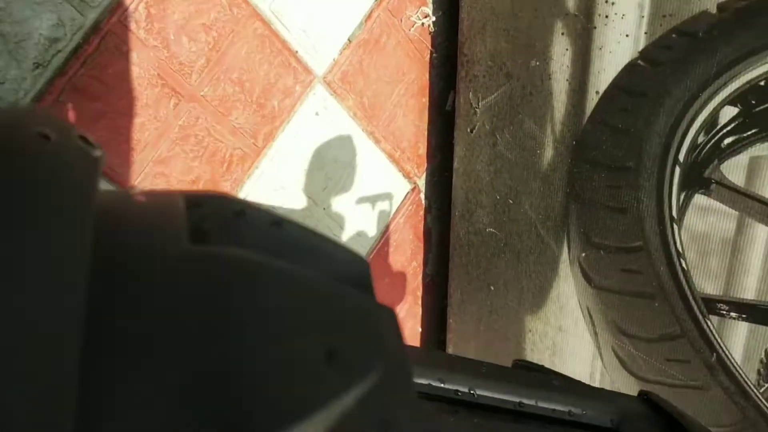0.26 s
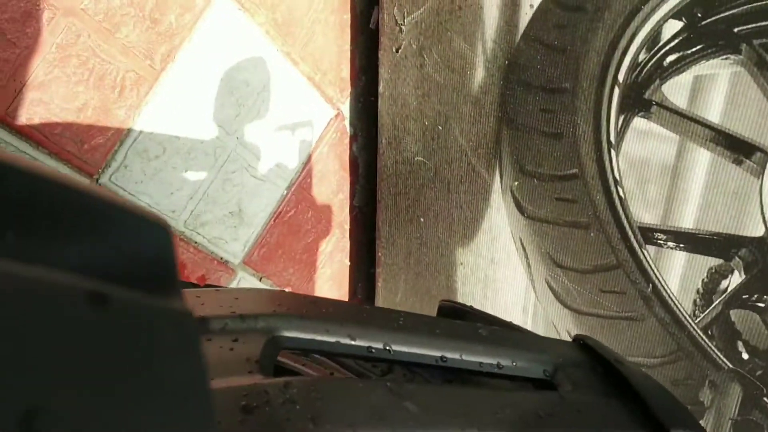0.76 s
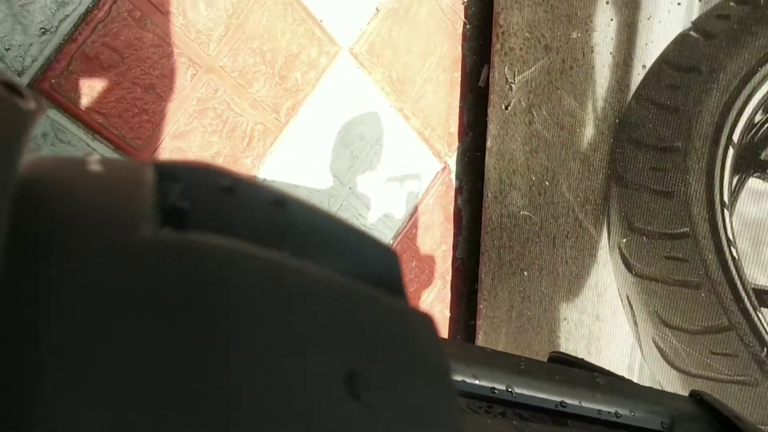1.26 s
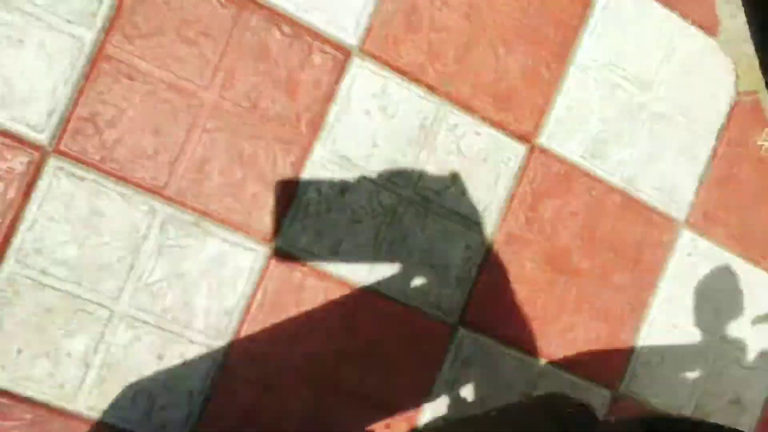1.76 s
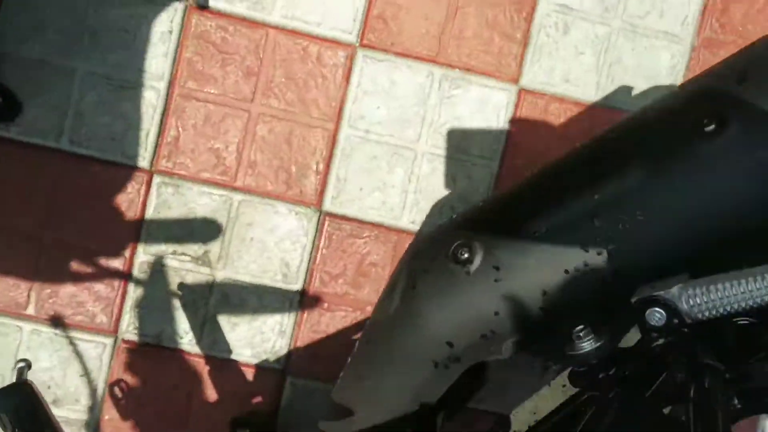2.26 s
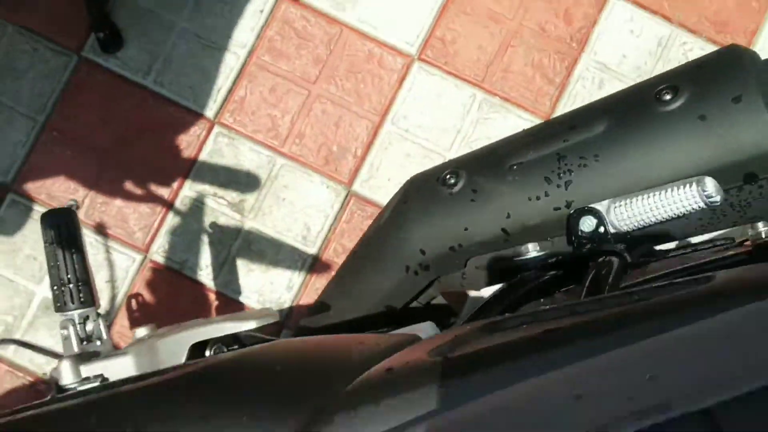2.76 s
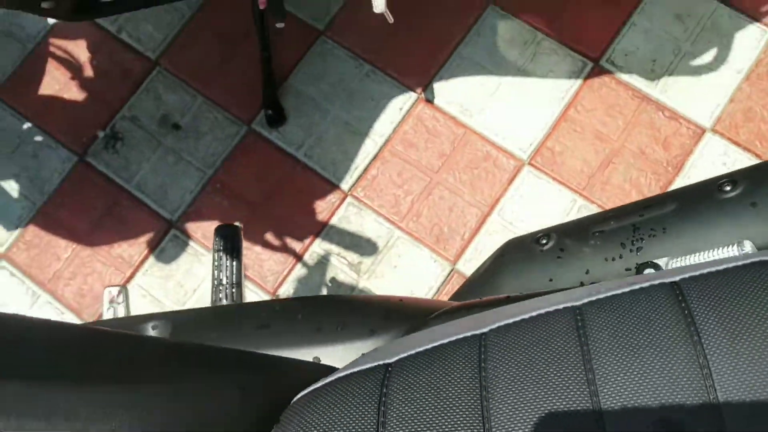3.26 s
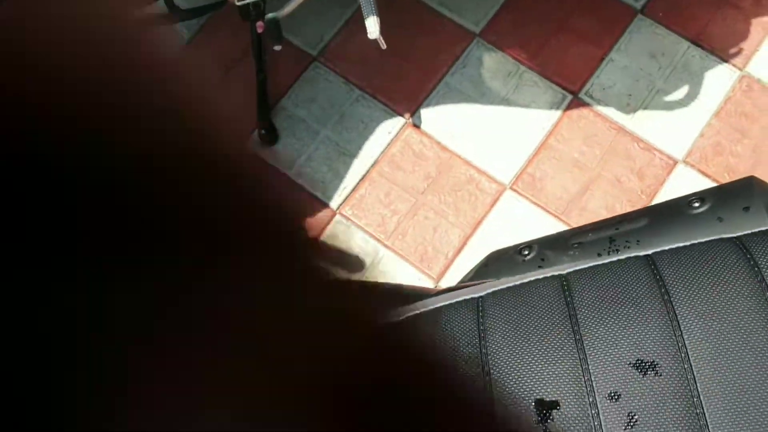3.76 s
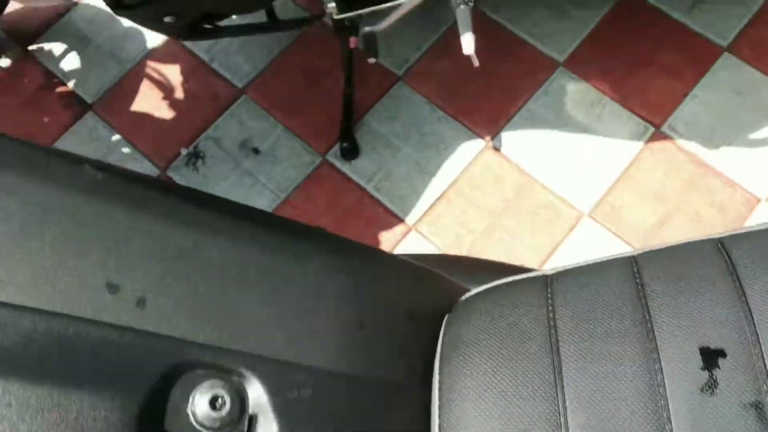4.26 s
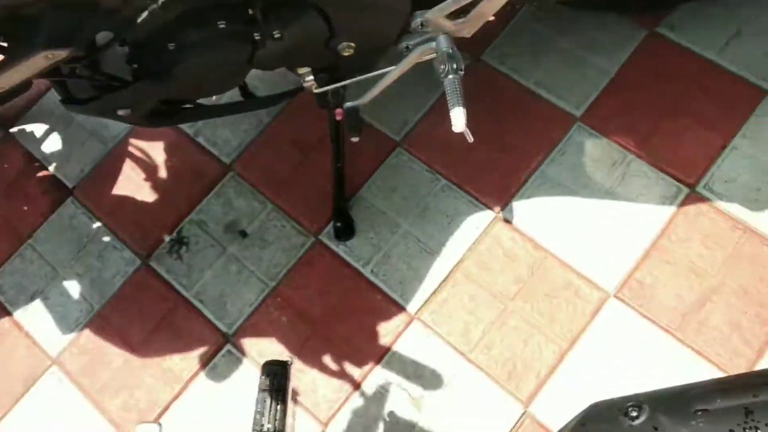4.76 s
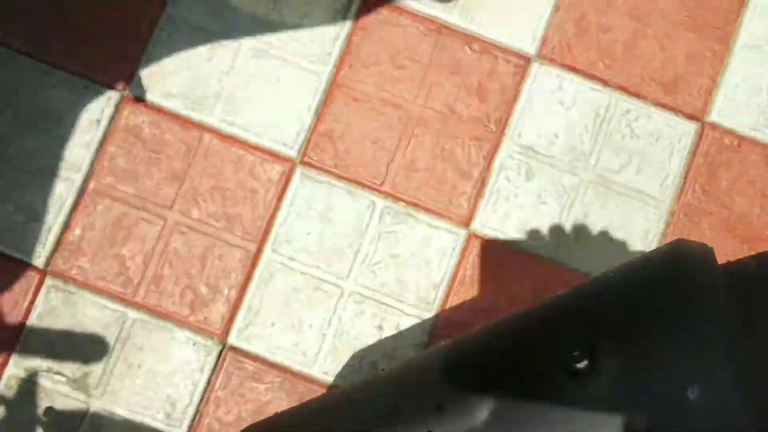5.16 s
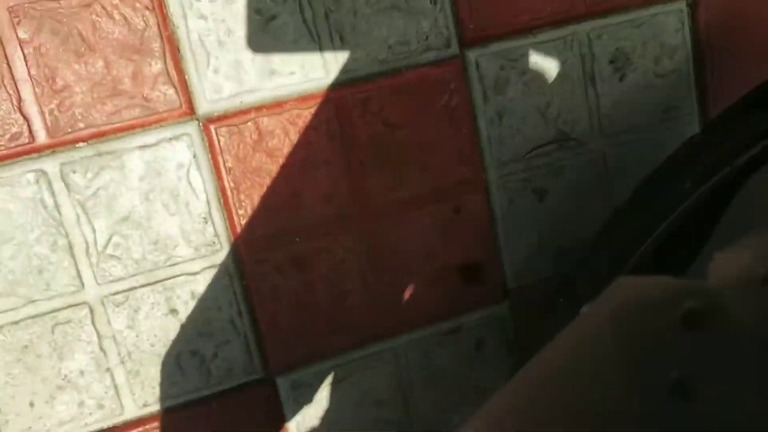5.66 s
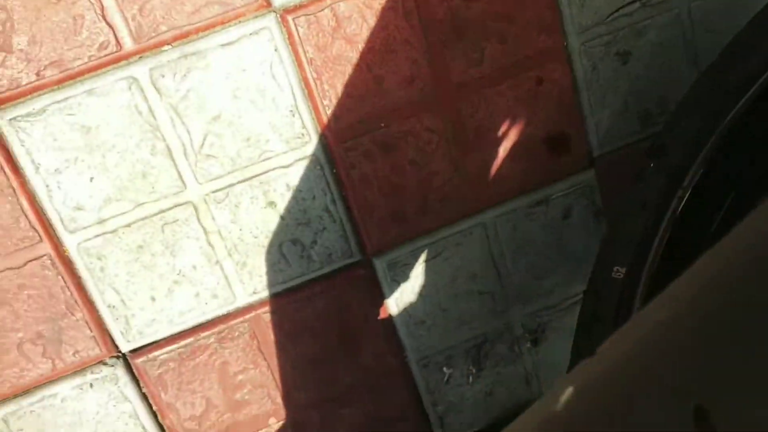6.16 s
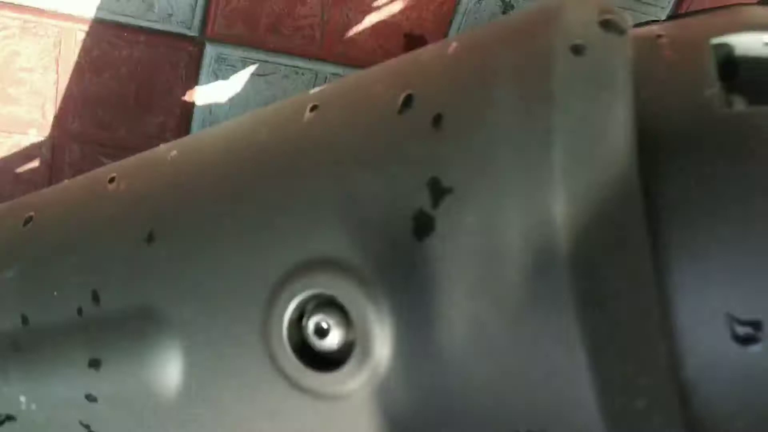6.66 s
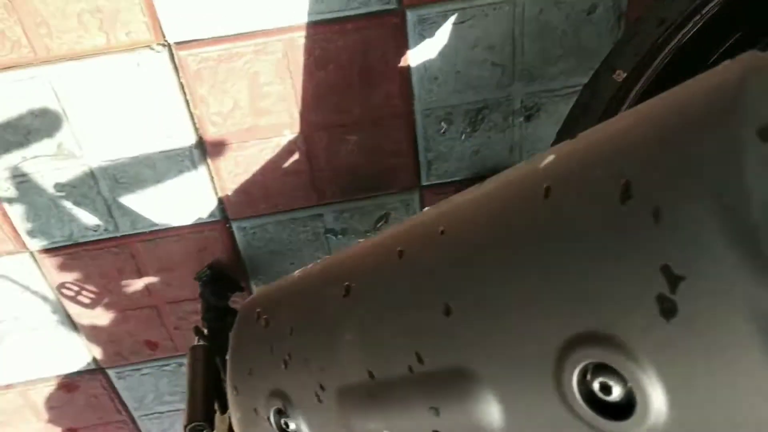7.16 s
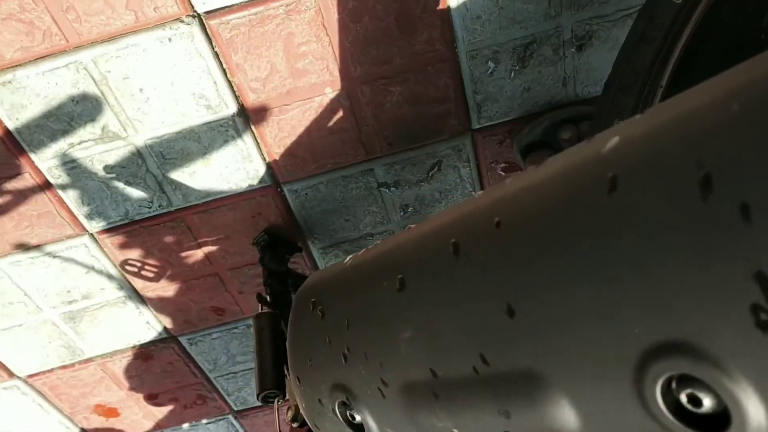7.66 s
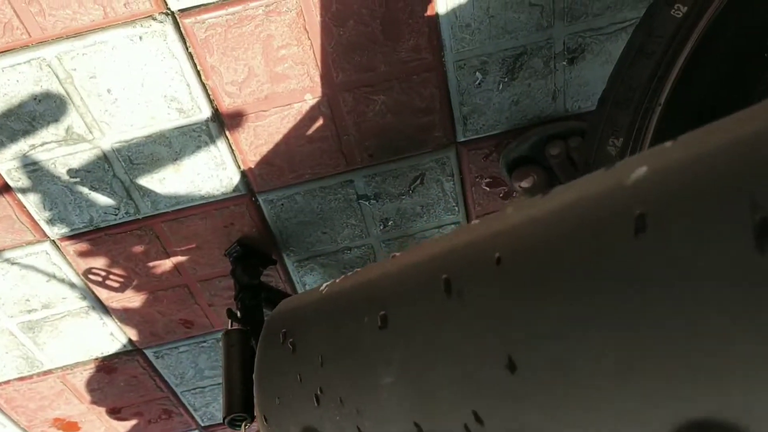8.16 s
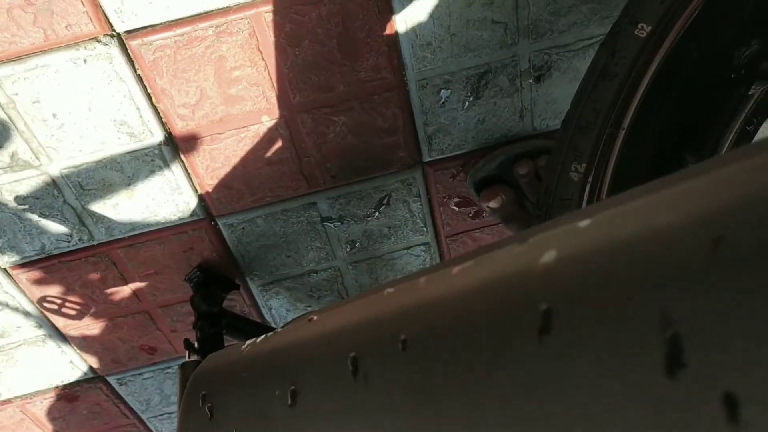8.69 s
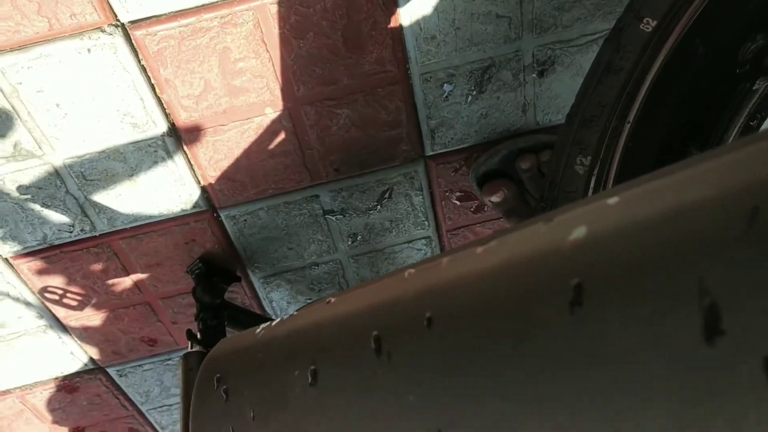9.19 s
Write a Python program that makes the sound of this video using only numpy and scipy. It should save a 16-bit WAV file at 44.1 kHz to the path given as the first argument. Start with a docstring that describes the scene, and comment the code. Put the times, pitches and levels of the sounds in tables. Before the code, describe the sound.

A single-cylinder motorcycle heard very close outdoors. It begins at a fast, throaty idle with metallic rattle and valve ticking, drops after about two seconds to a slow, separate thumping, with more intake gulping from above the seat, then moves down beside the silencer. Near the end a throttle blip surges with a rasp, falls away, and a second one is rising at the cut.

```python
"""A single-cylinder motorcycle is heard first at a fast idle; it drops to a slow idle, then two throttle blips rise,
the second still rising at the end. Each firing excites decaying silencer modes, a cracking wave front and the frame.
Whir, hiss, fin rattle, valve ticks, intake gulps and rasp are shaped noise or short rings timed by the crank.
The microphone pair moves from the tail to the seat and down to the silencer, changing levels, colour and panning."""
import sys
import numpy as np
from scipy import signal
from scipy.fft import rfft, irfft, next_fast_len
from scipy.io import wavfile

SR = 44100
rng = np.random.default_rng(int(sys.argv[2]) if len(sys.argv) > 2 else 0)


def transcribe(signal):
    """Save signal, clipped to [-1, 1], as a 16-bit WAV file at the path in sys.argv[1]."""
    frames = np.atleast_2d(signal).T
    limited = np.clip(frames, -1, 1)
    pcm = np.round(limited * 32767).astype(np.int16)
    wavfile.write(sys.argv[1], SR, pcm)


N = 415863
T = np.arange(N) / SR   # s

# States: 0 pulling, 1 idle from above, 2 idle close by, 3 throttle shut, 4 stumbling just after it shuts.
# Places: 0 tail, 1 seat, 2 silencer at idle, 3 silencer during the blips. One cycle holds one firing.

# Crank speed: time_s, firings_per_s
SPEED = [(0.0, 24.64), (0.6, 23.46), (1.42, 24.36), (1.59, 23.52), (1.68, 23.81), (2.19, 16.45),
         (3.82, 15.9), (4.36, 16.12), (4.56, 15.9), (6.26, 15.43), (7.12, 15.57), (7.46, 15.42),
         (7.62, 14.77), (7.84, 22.3), (8.26, 36.7), (8.37, 37.8), (8.5, 35.07), (8.66, 32.23), (8.78, 30.1),
         (8.86, 26.83), (9.17, 23.07), (9.43, 31.8)]
# Engine state, neighbours cross-fading: time_s, state
SPELLS = [(0, 0), (1.79, 0), (1.8, 1), (1.99, 1), (2.0, 0), (2.04, 0), (2.05, 1), (4.95, 1), (5.45, 2),
          (7.6, 2), (7.8, 0), (8.39, 0), (8.4, 4), (8.53, 4), (8.62, 3), (9.04, 3), (9.05, 0), (9.43, 0)]
# Listening place, neighbours cross-fading: time_s, place
PLACES = [(0, 0), (1.8, 0), (2.1, 1), (4.9, 1), (5.5, 2), (7.6, 2), (7.9, 3), (9.43, 3)]
# Delay of left behind right, of which each source takes a share: time_s, lag_samples
LAG = [(0, 19.5), (2.7, 19), (3.2, -6), (4.1, 17.5), (4.9, -19.5), (9.43, -11)]
FIRST_FIRING = .37   # cycles before the first firing
IDLE_PER_S, FAST_IDLE_PER_S = 16, 24.5   # firings per s

# Spectrum of the hand's rumble: frequency_hz, density_db_per_hz
HANDLING = [(12, -52), (20, -22), (43, -12), (80, -15), (110, -2), (140, -14), (240, -120)]
HANDLING_DB, CUTOFF_HZ = -57, 15650

# Engine at the microphones: time_s, whir_db at slow idle speed, left_right_db
ENGINE = [(0, -33, 0.5), (.6, -35.5, 2.5), (.95, -35, 5.5), (1.3, -34.5, 3.5), (1.95, -32, 0.5),
          (2.06, -28, 0), (2.7, -28.5, 0.5), (3.4, -31.5, 1.3), (4.0, -30.5, 1), (4.4, -32.5, -1),
          (5.0, -30.5, -0.8), (5.8, -33, -2), (7.7, -32, -3), (7.95, -33.5, 0), (8.2, -32.5, -1),
          (8.45, -34, -2.5), (8.8, -36, 0), (9.15, -34, -1), (9.43, -33, 2)]
# Whir spectrum before the casing: frequency_hz, density_db_per_hz
WHIR = [(210, -69), (350, -12.5), (663, -6), (749, -5.5), (1020, -7.5), (1240, -9.5), (1760, -10.5),
        (2490, -12), (2760, -15.5), (3300, -14.5), (4290, -20), (7260, -120)]
# Hiss spectrum before the casing: frequency_hz, density_db_per_hz
HISS = [(1760, -48), (3000, -7.5), (3820, -8), (4460, -3), (6000, -7.5), (8260, -9), (9690, -11.5),
        (12800, -14.5), (14900, -7.5), (15800, -41)]
# Casing resonances, broad humps and shadows: frequency_hz, width_hz, lift_db at each of the four places
CASING = [(1040, 42, 9.5, 1.3, 4.5, 12), (1730, 62, 10.5, 1, -6, 8), (1822, 49, 7, 4, 9.5, 7),
          (2080, 80, 8, 4.1, 2.5, 9.5), (2334, 51, 10.5, 2.4, 0, 9.5), (3800, 1400, 2, 0.5, -3, -2),
          (4560, 77, 1, 5, 1, 3), (6060, 1200, 0, 2.2, -1.5, -3.5), (7340, 110, 9, 5.7, 6, 5),
          (8300, 170, 7.5, 6.9, 5.5, 6), (10600, 4700, 1, 2.1, -0.2, 2)]
# Whir swell above and below its mean in each cycle: depth_db per state
SWELL_DB = [1.05, 1.8, 3, 0.72, 0.36]
# Stroke-to-stroke variation of whir and intake, scaled through the stroke: spread_db per place
CLATTER_DB = [0.7, 1.0, 0.7, 0.8]
# Hiss jump: lead_s on the firing, strength (ratio), one row per state
PUFF = [(0.0065, 1.82), (0.0035, 0.71), (0.006, 1.36), (0.0013, 1.27), (0.0013, 1.6)]
# Borders between the low, middle and high bands of the hiss: frequency_hz
HISS_SPLITS_HZ = [5600, 9500]
WHIR_DB_PER_OCTAVE, HISS_UNDER_WHIR_DB = 3.5, 4   # whir and hiss both grow with speed
# Fin rattle, hidden as the microphones sink beside the silencer: time_s, level_db re whir before a 9 dB cut
RATTLE = [(0, 6), (.12, 7.5), (.45, 7), (.7, 2), (1.2, 5), (1.45, 4.5), (1.75, 4.5), (2.1, -3), (4.0, 1),
          (4.7, -21), (5.8, -12), (7.8, -4.5), (8.25, 0), (9.43, -4)]
# Fin rattle spectrum: frequency_hz, density_db_per_hz
FINS = [(2450, 2), (2680, 12), (2775, 16.0), (2900, 8.5), (3300, 7.5)]
# Valve ticks: share_of_cycle after firing, frequency_hz, t60_s, share_of_fin_shading, level_db re whir at each place
VALVES = [(0.21, 890, 0.0095, 0, 2, 1, 3, 3), (0.44, 2800, 0.004, 0.98, 1, 0, 2, 2),
          (0.4, 1740, 0.015, 0.96, 5, 0, 5, 6), (0.012, 6800, 0.0072, 0, -11, -11, -5, -11),
          (0.14, 5080, 0.04, 0, -4, -14, -8, -9), (0.17, 3590, 0.04, 0, -2, -10, -9, -9),
          (0.18, 4590, 0.045, 0, -1, -12, -4, -5), (0.1, 7320, 0.02, 0, -7, -15, -7, -12),
          (0.86, 2800, 0.025, 1.6, -5, -1, 0, -2)]
# Filter box, loudest from above the seat: time_s, intake_db, resonance_hz
INTAKE = [(0, -35.5, 920), (.9, -52, 950), (1.3, -42, 1017), (1.8, -43, 900), (2.06, -30, 840),
          (2.7, -33, 770), (3.4, -35.5, 793), (4.2, -29, 724), (4.9, -34.5, 776), (5.5, -36.5, 920),
          (7.8, -39.5, 898), (8.2, -44, 932), (8.36, -32, 1040), (8.65, -40, 905), (9.05, -38, 940),
          (9.43, -57, 805)]
# Second, lower filter-box resonance: level_db per place
LOW_INTAKE_DB = [-20, -6.5, -7.5, -5.5]
LOW_INTAKE_RATIO = 0.677   # lower resonance / main resonance
# Flat intake noise: frequency_hz, density_db_per_hz
INTAKE_AIR = [(300, 0), (3000, 0)]
# Rasp of gas at the outlet when revved: time_s, level_db
RASP = [(7.8, -60), (8.0, -46), (8.25, -29.5), (8.4, -33), (8.6, -47), (8.9, -50), (9.15, -38), (9.43, -42)]
# Rasp spectrum: frequency_hz, density_db_per_hz
RASP_COLOUR = [(800, -20), (1100, -7), (1800, 1), (2600, 1), (3300, -3), (4200, -19)]

# Unburnt gas popping in the pipe: time_s, onset_db
AFTERBURN = [(1.318, -16), (1.327, -17), (1.864, -24), (2.05, -22), (4.211, -28), (4.402, -28)]
# Pop spectrum: frequency_hz, density_db_per_hz
POP = [(130, 23.5), (500, -2.0), (1000, 6.0), (1900, 3), (3300, 2), (5000, -12), (9000, -31)]
# Turbulent gas relative to the note: level_db per state
RUMBLE_DB = [-19, -6, -15, -17, -7]
# Turbulent gas spectrum: frequency_hz, density_db_per_hz
RUMBLE = [(120, -27.5), (180, -5.5), (230, -6.5), (300, -6.0), (345, -7.5), (420, -18.5), (600, -20.5)]
# Tailpipe bark and its repeat: time_s, resonance_hz, repeat_after_s, repeat_db
BARK = [(0, 445, 0.0088, -6), (1.8, 460, 0.0078, -1.1), (5.4, 470, 0.012, 6), (7.6, 460, 0.011, 4),
        (8.0, 448, 0.0056, -8), (8.352, 440, 0.0056, 5), (8.6, 540, 0.0048, -18), (8.85, 600, 0.0059, -20),
        (9.05, 520, 0.005, -21), (9.25, 595, 0.0069, -20), (9.43, 620, 0.0063, -18)]
CRACK_LAG_S = .0012
# Exhaust at the microphones: time_s, level_db re the state's note, crack_db re the note, left_right_db
EXHAUST = [(0, -0.5, -22.5, 0.5), (.5, 0.1, -28, -4), (1.75, -0.5, -28, -1.3), (1.9, -6, -15, -2),
           (2.05, -0.3, -36, -0.5), (3.15, 1.3, -25, -1.5), (3.8, -1.3, -22, -1.1), (4.9, -0.2, -21, -1.5),
           (5.4, 0.5, -21.5, .6), (6.3, 1.2, -19, 3.5), (6.75, -0.5, -24, -2), (7.6, -1, -28, 1.5),
           (7.8, -1.5, -19.5, 2.5), (8.38, 4.5, -21, 5.5), (8.43, 2.5, -17, 6), (8.66, 1, -9, 7.5),
           (8.86, 5.5, -9.5, 8), (9.035, 0.8, -8, 7), (9.06, 0, -15.5, 4.5), (9.43, 2, -15.5, 8)]
# Exhaust note before the place level: level_db per state
NOTE_DB = [-15, -22, -20.5, -22, -23]
# Firing-to-firing variation: spread_db per state
UNEVEN_DB = [0.72, 0.99, 1.3, 0.7, 1.6]
# Firings unlike their neighbours: time_s, level_db, late_s
ODD_FIRINGS = [(1.309, -8, 0.00059), (2.2, 3.5, 0.00082), (4.17, 3, 0.002), (8.52, 4, 0.0012),
               (8.735, 1, -.001), (8.985, -0.5, 0.0024), (9.025, 1.5, 0.0025)]
# Silencer modes of alternating sign, before warmth, speed and decay factors: frequency_hz, t60_s, level_db per state
SILENCER = [(72, 0.045, -17, -11.5, -18, -10, -20), (133.5, 0.035, -35, -59, -39.5, -32, -19),
            (177, 0.021, -13, -44, -13, -20, -2.5), (196, 0.026, -40, -18, -9.5, -40, -14.5),
            (222.5, 0.092, -6.5, -10, -5.5, -11.5, -8.5), (279.6, 0.081, 1.7, -10.5, -4.5, -5.5, -9.5),
            (294, 0.084, -4.5, -4.5, -0.5, -31, -7.5), (313.1, 0.13, -54, -8.5, -9, -40, -12)]
# Excitation, one row per state: blow_down_lag_s, piston_push_lag_s after it, push_strength (ratio),
# warmth_pitch_factor (ratio), valve_abruptness_hz
STATES = [(-.0023, 0.013574, -0.29, 1.0113, 550), (-.0026, .0097, -0.65, 1.007, 370),
          (-.0021, 0.01157, 0.39, 1.009, 320), (-.0026, 0.0053, -0.14, 0.96, 430),
          (-.0026, 0.01097, 0.55, 1.05, 360)]
# Factor on silencer decay times: ratio per state
RING_ON = [0.86, 1.45, 1.01, 1.5, 0.97]
# Pitch rise above fast idle: share_per_octave of speed, per state
RISE_PER_OCTAVE = [0.069, .11, .11, 0.25, 0.092]
# Speed at which flow begins to damp the ring: firings_per_s per state
FLOW_FROM_PER_S = [24.1, 24.5, 24.5, 28.8, 29.6]
# Flow damping for each octave above that speed: damping_db_per_s per state
FLOW_DAMPING_DB_PER_S = [460, 452, 452, 300, 300]
# Frame and shield modes shaken by each firing: frequency_hz, t60_s, level_db per state
FRAME = [(80.2, 0.3, -36, -32, -27.5, -33, -25), (136, 0.13, -42, -42, -34, -28, -24.5),
         (460, 0.051, -74, -44, -36.5, -36, -28)]


def amp(db):
    """Decibels are a logarithmic ratio of amplitudes."""
    return 10 ** (np.asarray(db) / 20)


def rms_one(x):
    """Root-mean-square normalization: scale the signal to unit rms."""
    return x / np.sqrt(np.mean(x ** 2) + 1e-20)


def in_time(rows):
    """Linear interpolation turns the columns of a table into curves in time."""
    s, *columns = np.transpose(rows)
    return [np.interp(T, s, column) for column in columns]


def by_row(schedule, values):
    """Linear cross-fading moves between the values chosen by a schedule."""
    s, index = np.transpose(schedule)
    return np.interp(T, s, np.take(values, index.astype(int)))


def by_state(values):
    """Cross-fading follows one value per engine state."""
    return by_row(SPELLS, values)


def by_place(values):
    """Cross-fading follows one value per listening place."""
    return by_row(PLACES, values)


def drift(rate_hz):
    """A first-order random process wanders slowly: 60 unit-rms knots per second, joined by lines."""
    knots = rng.standard_normal(int(T[-1] * 60) + 2)
    memory = np.exp(-2 * np.pi * rate_hz / 60)
    wander = rms_one(signal.lfilter([1], [1, -memory], knots))
    return np.interp(T * 60, np.arange(len(knots)), wander)


def coloured(spectrum, alike, through_casing=False):
    """Spectral shaping colours unit-rms stereo noise; a shared part sets coherence, the casing adds resonances."""
    size = next_fast_len(N)
    hz = np.arange(size // 2 + 1) * SR / size + 1e-3
    corner_hz, corner_db = np.transpose(spectrum)
    density_db = np.interp(np.log(hz), np.log(corner_hz), corner_db, -90, -90)
    shared, left, right = rng.standard_normal((3, size))
    noise = np.sqrt(alike) * shared + np.sqrt(1 - alike) * np.array([left, right])
    lines = rfft(noise) * amp(density_db)
    if not through_casing:
        return rms_one(irfft(lines, size)[:, :N])
    out = 0
    for k, here in enumerate(np.eye(4)):
        lift_db = sum(row[2 + k] / (1 + (2 * (hz - row[0]) / row[1]) ** 2) for row in CASING)
        out = out + by_place(here) * irfft(lines * amp(lift_db), size)[:, :N]
    return rms_one(out)


def damped(hz, t60, length=.3):
    """A damped oscillator rings as a sine whose unit envelope falls 60 dB in t60 seconds."""
    t = T[:int(length * SR)]
    return np.sin(2 * np.pi * hz * t) * amp(-60 * t / t60)


def strike(times, sizes, response):
    """Linear superposition: convolution starts a scaled response at each impulse."""
    clicks = np.zeros(N)
    inside = (times >= 0) & (times < T[-1])
    clicks[(times[inside] * SR).astype(int)] = sizes[inside]
    return signal.oaconvolve(clicks, response)[:N]


def placed(x, pan_db, lag_share):
    """Level and arrival-time differences between two microphones give direction."""
    left, right = np.broadcast_to(x, (2, N))
    samples = np.arange(N)
    late = np.interp(samples - lag_share * in_time(LAG)[0], samples, left)
    return np.array([late * amp(pan_db / 2), right * amp(-pan_db / 2)])


def crank():
    """Phase is the time integral of rate: return cycles run and firings per second."""
    rate = in_time(SPEED)[0]
    return np.cumsum(rate) / SR - FIRST_FIRING, rate


def at_share(cycles, share):
    """Inverting the phase curve gives the times at which a share of each cycle is passed."""
    return np.interp(np.arange(int(cycles[-1]) + 1) + share, cycles, T, right=99)


def clipped_chance(shape):
    """A normal distribution clipped at 1.6 limits random extremes."""
    return np.clip(rng.normal(0, 1, shape), -1.6, 1.6)


def handling():
    """Vibration of the hand reaches the microphones as low-frequency noise."""
    return amp(HANDLING_DB) * coloured(HANDLING, 0.8)


def stroke_variation(cycles):
    """Cycle-to-cycle variation gives each stroke a level offset in dB, greatest near the intake stroke."""
    chance = clipped_chance(400)[np.floor(cycles + .58).astype(int) + 1]
    stroke = np.exp(2.0 * (np.cos(2 * np.pi * (cycles - .92)) - 1))
    return by_place(CLATTER_DB) * chance * (0.32 + 2.4 * stroke)


def gas_hiss(cycles, rate, swell):
    """Amplitude modulation: three bands of one gas noise jump around each firing and decay exponentially."""
    lead, jump = map(by_state, np.transpose(PUFF))
    led_cycles = cycles + lead * rate
    since_s = (led_cycles % 1) / rate
    chance = clipped_chance((400, 4))[np.floor(led_cycles).astype(int) + 1]
    puff = jump * (1 - np.exp(-since_s / 0.0022)) * np.exp(-since_s / 0.039)
    rest, hiss = coloured(HISS, 0.046, True), 0
    for k, split_hz in enumerate([*HISS_SPLITS_HZ, None]):
        band = rest
        if split_hz:
            band = signal.sosfiltfilt(signal.butter(4, split_hz, fs=SR, output="sos"), rest)
        rest = rest - band
        strength = amp(1.2 * chance[:, 0] + 2.2 * chance[:, 1 + k])   # common and separate variation
        hiss = hiss + (0.77 + puff * strength) * amp(1.1 * drift(16)) * band
    return rms_one(hiss * swell ** 0.89)


def fin_rattle(rattle_db, swell):
    """Amplitude modulation makes narrow-band fin noise swell with the cycle."""
    level = amp(rattle_db - 9.0 + 1.7 * drift(4.4))
    return level * swell ** 1.12 * coloured(FINS, 0.11)


def valve_ticks(cycles, rattle_db):
    """Impact excitation: short damped modes are struck at fixed crank phases."""
    ticks = 0
    for share, tick_hz, t60, shaded, *tick_db in VALVES:
        times = at_share(cycles, share)
        level_db = np.interp(times, T, by_place(tick_db) + shaded * rattle_db)
        sizes = amp(level_db + 3 * clipped_chance(len(times)))
        ticks = ticks + strike(times, sizes, damped(tick_hz, t60, .05))
    return ticks


def intake(cycles, level_db, centre_hz, width_hz=75, gulp_db=10):
    """Cavity resonance: air noise gulps late in each cycle through two moving filter-box resonances."""
    white, box = coloured(INTAKE_AIR, alike=0.13), 0
    r = np.exp(-np.pi * width_hz / SR)
    for ratio, mode_db in (1, 0), (LOW_INTAKE_RATIO, by_place(LOW_INTAKE_DB)):
        out, state = np.zeros((2, N)), np.zeros((2, 2))
        for i in range(0, N, 512):   # the resonance moves block by block
            poles = [1, -2 * r * np.cos(2 * np.pi * ratio * centre_hz[i] / SR), r * r]
            out[:, i:i + 512], state = signal.lfilter([1, 0, -1], poles, white[:, i:i + 512], zi=state)
        box = box + amp(mode_db) * rms_one(out)
    opening = np.exp(1.5 * (np.cos(2 * np.pi * (cycles - .9)) - 1))
    gulp = amp(gulp_db * opening + 0.46 * drift(46))
    return amp(level_db) * rms_one((box + 0.53 * white) * gulp)


def rasp(cycles):
    """Turbulent outlet flow makes rough noise, modulated to peak just after each firing."""
    beat = amp(1.8 * np.cos(2 * np.pi * (cycles - .15)) + 1.5 * drift(25))
    return amp(in_time(RASP)[0]) * rms_one(beat * coloured(RASP_COLOUR, 0.17))


def engine(cycles, rate):
    """Superposition joins whir, hiss, rattle, ticks, intake and rasp under one crank."""
    idle_db, pan_db = in_time(ENGINE)
    whir_db = idle_db + WHIR_DB_PER_OCTAVE * np.log2(rate / IDLE_PER_S)
    rattle_db, = in_time(RATTLE)
    uneven_db = stroke_variation(cycles)
    cycle_db = by_state(SWELL_DB) * np.cos(2 * np.pi * (cycles - .92))
    swell = amp(cycle_db + uneven_db + 0.37 * drift(4.8))
    whir = rms_one(swell * coloured(WHIR, 0.22, True))
    mechanical = whir + fin_rattle(rattle_db, swell) + valve_ticks(cycles, rattle_db)
    hiss = amp(whir_db - HISS_UNDER_WHIR_DB) * gas_hiss(cycles, rate, swell)
    gulps = amp(uneven_db / 2) * intake(cycles, *in_time(INTAKE))
    both = amp(whir_db) * mechanical + hiss + gulps + rasp(cycles)
    return placed(both, pan_db, lag_share=0.87)


def afterburn():
    """Late combustion in the pipe gives broad noise bursts with exponential decay."""
    s, onset_db = np.transpose(AFTERBURN)
    shape = strike(s, amp(onset_db), amp(-60 * T[:4000] / 0.05))
    return shape * coloured(POP, alike=0.24)


def gas_rumble(note_db):
    """Turbulent gas excites low-frequency noise in the silencer."""
    return amp(note_db + by_state(RUMBLE_DB) + 0.8 * drift(1.9)) * coloured(RUMBLE, alike=0.8)


def bark(firings, sizes):
    """A steep blow-down front excites short outlet modes; the main ring repeats after a delay."""
    out = np.zeros(N + SR)
    s, *columns = np.transpose(BARK)
    curves = [np.interp(firings, s, column) for column in columns]
    for at, size, hz, again, again_db in zip(firings, sizes, *curves):
        ring = damped(hz, 0.039, .04)
        front = ring + amp(11.5) * damped(530, 0.0043, .04) + amp(4.5) * damped(910, 0.0014, .04)
        for lag, sound in (0, front), (again, amp(again_db) * ring):
            start = min(int((at + CRACK_LAG_S + lag) * SR), N)
            out[start:start + len(ring)] += size * sound / np.linalg.norm(front)
    return out[:N]


def lay(times, sizes, response, rises, damping_db):
    """Time compression raises each response's pitch, while flow adds exponential damping in dB per second."""
    out, steps = np.zeros(N + SR), np.arange(len(response))
    for s, size, rise, loss_db in zip(times, sizes, rises, damping_db):
        if size and s < T[-1]:
            faster = np.interp(steps * (1 + rise), steps, response, right=0)
            start = int(s * SR)
            out[start:start + len(steps)] += size * faster * amp(-loss_db * steps / SR)
    return out[:N]


def silencer_ring(k, warmth, abrupt_hz):
    """Modal synthesis sums damped silencer modes, softened by valve opening and weak bass radiation."""
    ring = 0
    for m, row in enumerate(SILENCER):
        sign = -(-1) ** m
        ring = ring + sign * amp(row[2 + k]) * damped(row[0] * warmth, row[1] * RING_ON[k])
    r = np.exp(-2 * np.pi * abrupt_hz / SR)
    ring = signal.lfilter([(1 - r) ** 2], [1, -2 * r, r * r], ring)   # the valve opens gradually
    return signal.lfilter(*signal.butter(2, 100, "high", fs=SR), ring)   # a narrow outlet radiates bass poorly


def exhaust(cycles, rate):
    """Impulsive excitation: blow-down and piston push ring the silencer and the firing shakes the frame."""
    heard_db, crack_db, pan_db = in_time(EXHAUST)
    note_db = heard_db + by_state(NOTE_DB)
    firings = at_share(cycles, 0)
    size_chance, push_chance = rng.normal(0, 1, (2, len(firings)))
    size = np.interp(firings, T, amp(note_db) / np.sqrt(rate / SR))   # equal mean power at any speed
    size = size * amp(np.interp(firings, T, by_state(UNEVEN_DB)) * size_chance)
    for s, odd_db, late_s in ODD_FIRINGS:
        odd = np.argmin(abs(firings - s))
        size[odd] *= amp(odd_db)
        firings[odd] += late_s
    spell_s, spell = np.transpose(SPELLS)
    firing_rate = np.interp(firings, T, rate)
    octaves = np.maximum(np.log2(firing_rate / FAST_IDLE_PER_S), 0)
    note = 0
    for k, (lag, push_lag, push, warmth, abrupt_hz) in enumerate(STATES):
        ring = silencer_ring(k, warmth, abrupt_hz)
        late = np.r_[np.zeros(int(push_lag * SR)), ring][:len(ring)]
        scale = size * np.interp(firings, spell_s, spell == k) / np.linalg.norm(ring + push * late)
        shaken = sum(amp(row[2 + k]) * damped(row[0], row[1]) for row in FRAME)
        flow_octaves = np.maximum(np.log2(firing_rate / FLOW_FROM_PER_S[k]), 0)
        flow_db = FLOW_DAMPING_DB_PER_S[k] * flow_octaves
        rise = RISE_PER_OCTAVE[k] * octaves
        starts, push_size = firings + lag, scale * push * amp(0.5 * push_chance)
        note = note + lay(starts, scale, ring, rise, flow_db)
        note = note + lay(starts, push_size, late, rise, flow_db)
        note = note - strike(starts, scale, shaken)
    crack = bark(firings, size * np.interp(firings, T, amp(crack_db)))
    return placed(note + crack + gas_rumble(note_db) + afterburn(), pan_db, lag_share=0.48)


def scene():
    """Linear superposition adds engine and exhaust driven by the same crank."""
    cycles, rate = crank()
    return engine(cycles, rate) + exhaust(cycles, rate)


def record(dry):
    """Transduction rounds peaks, loses deep bass, adds hand rumble and cuts the top."""
    rounded = 1.6 * np.tanh(dry / 1.6)
    lean = signal.sosfilt(signal.butter(4, 135, "high", fs=SR, output="sos"), rounded)
    lean = lean + handling()
    return signal.sosfilt(signal.cheby2(16, 80, CUTOFF_HZ, fs=SR, output="sos"), lean)


dry = scene()
out = record(dry)
transcribe(out)
```